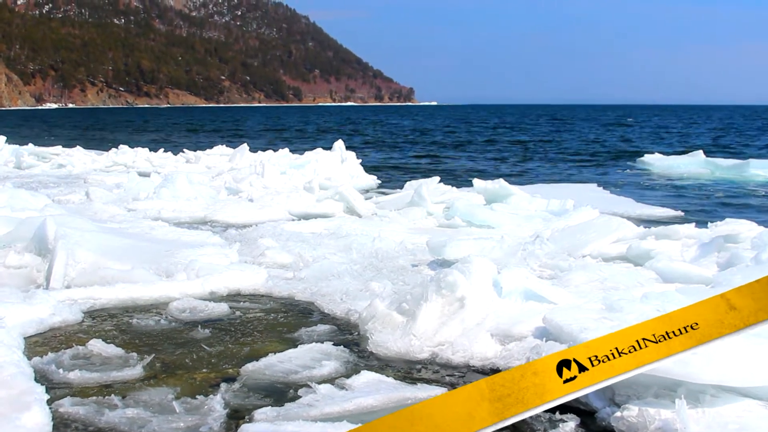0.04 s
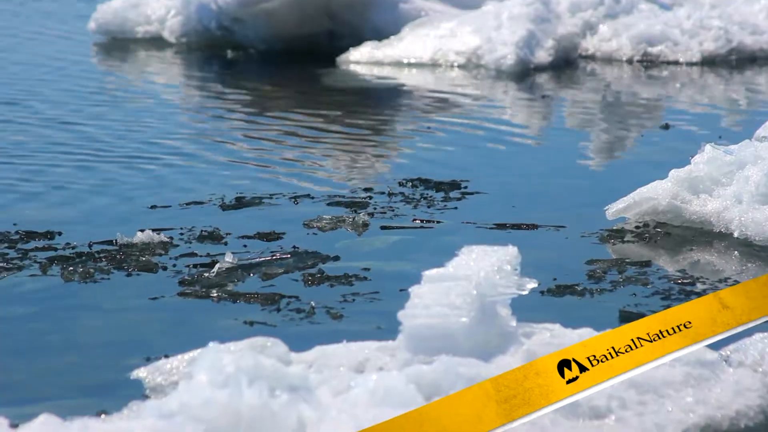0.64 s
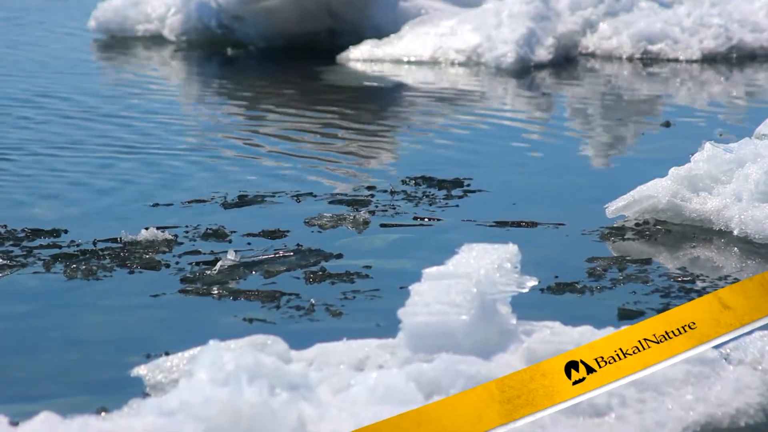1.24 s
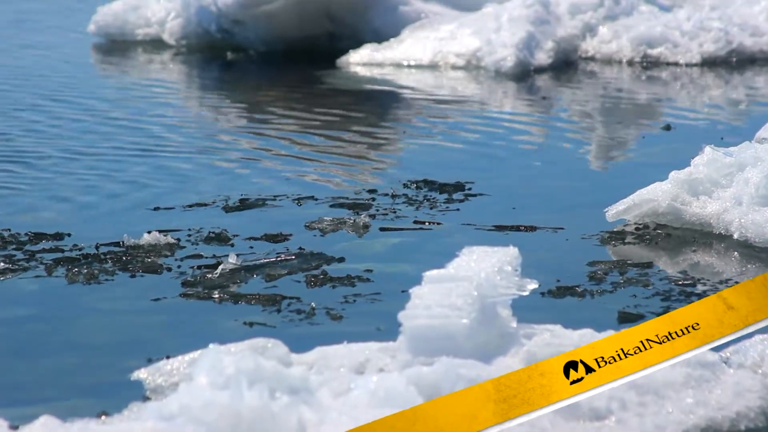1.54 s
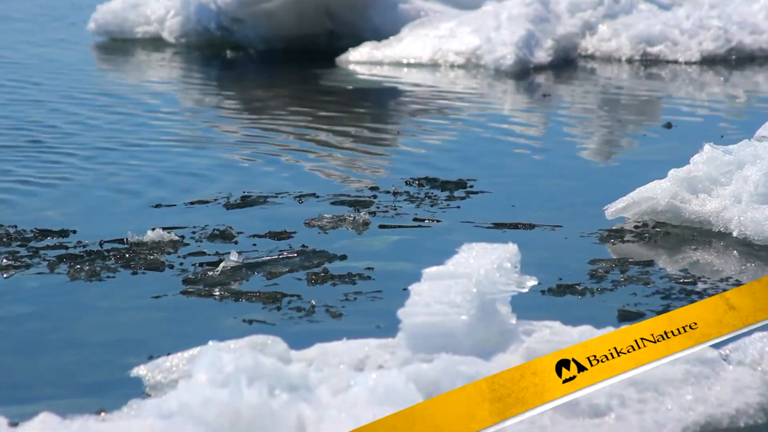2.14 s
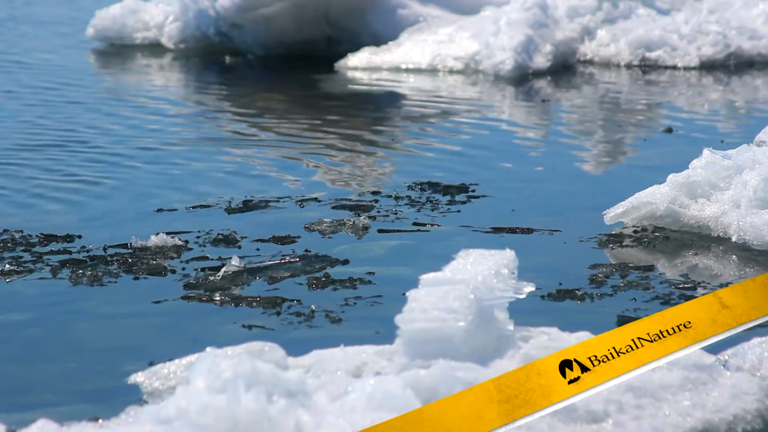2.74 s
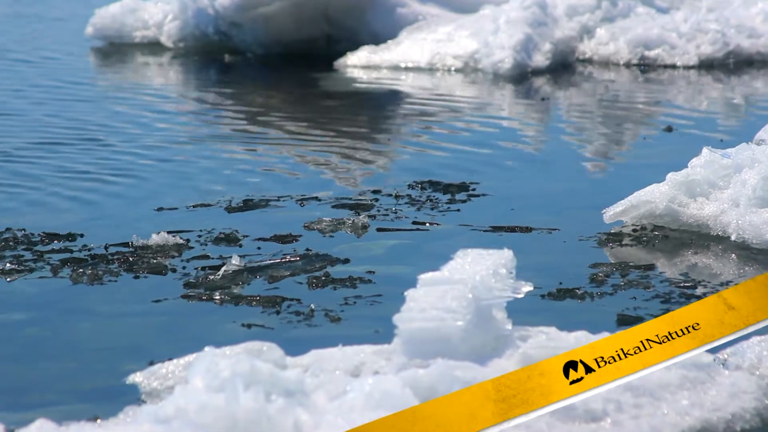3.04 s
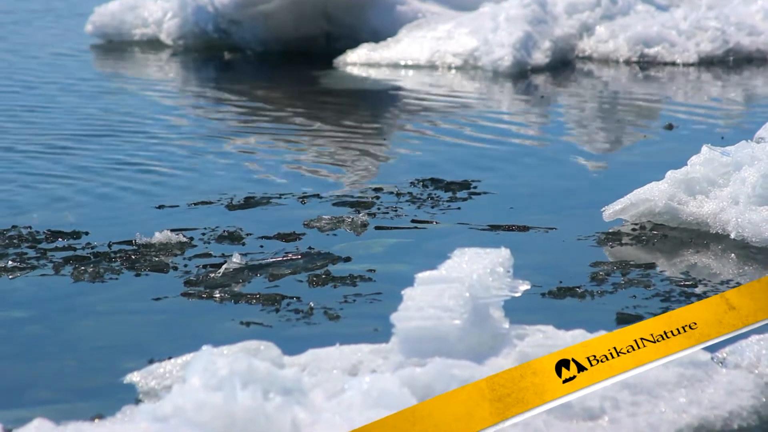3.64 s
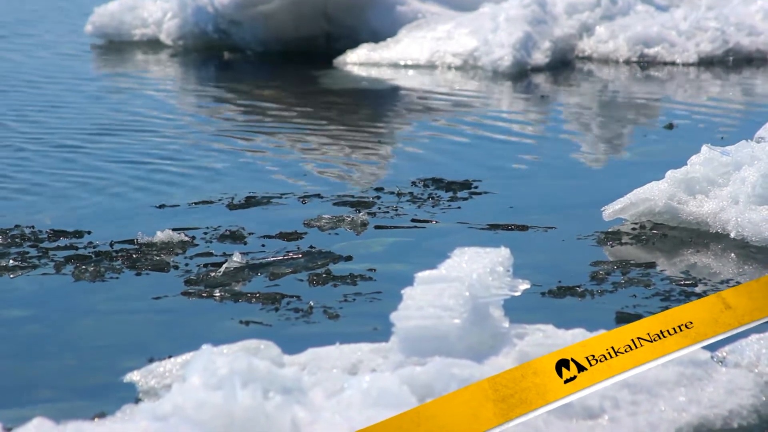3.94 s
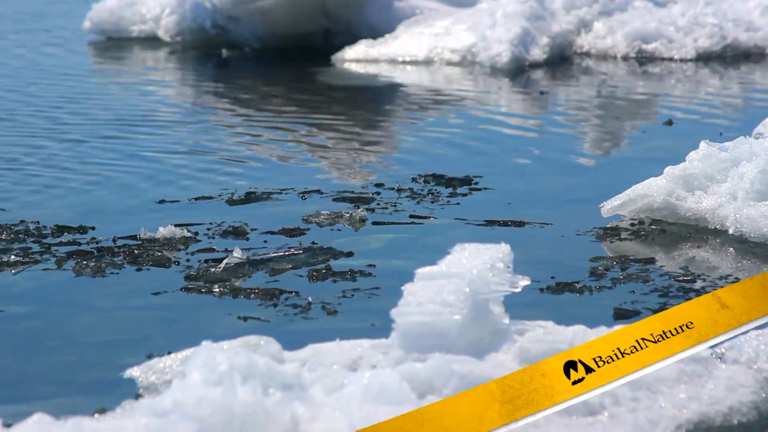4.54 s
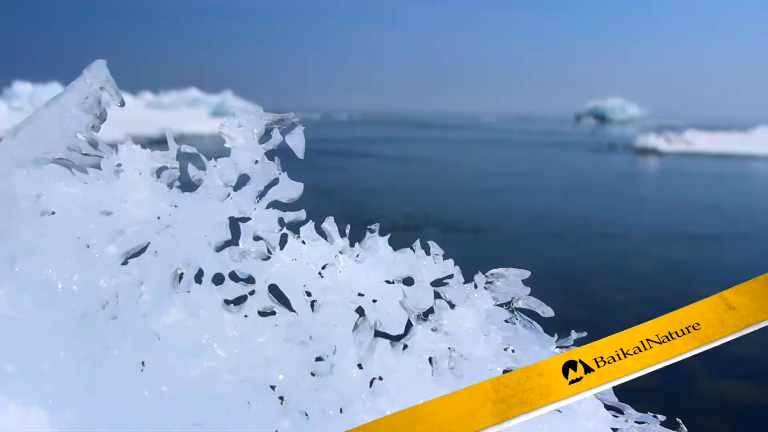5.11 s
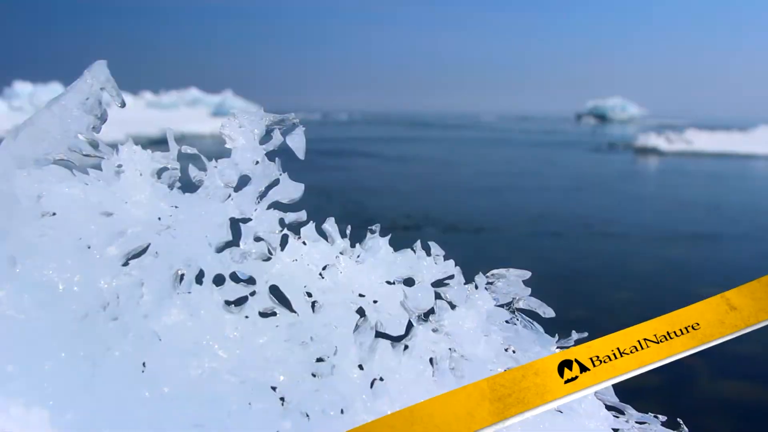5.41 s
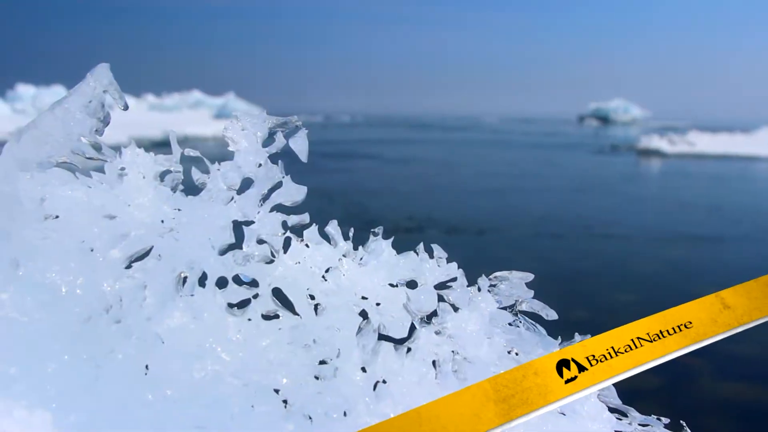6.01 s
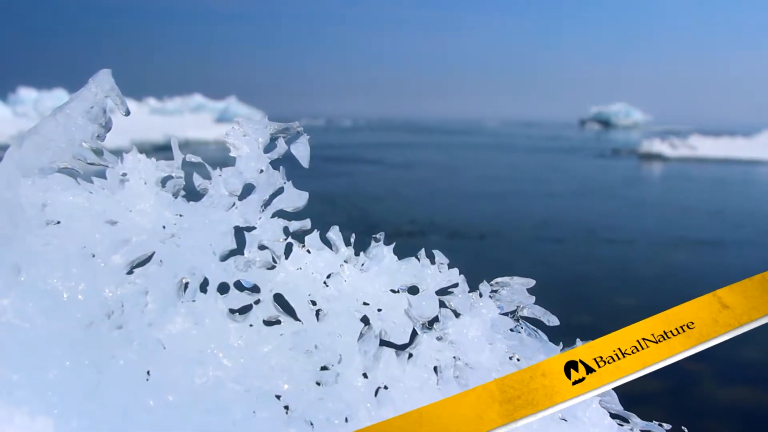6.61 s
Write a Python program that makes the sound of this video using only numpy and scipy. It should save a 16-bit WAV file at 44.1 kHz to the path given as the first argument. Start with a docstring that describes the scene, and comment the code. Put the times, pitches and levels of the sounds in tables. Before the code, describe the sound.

Small waves lap and trickle softly among melting ice at a lake edge for about seven seconds, over a steady, quiet wash of open water. Bubbles ring lightly and fine spray ticks on the ice. Close drips plink irregularly from about 0.8 to 4.6 seconds, and small watery slaps stand out a little at 3.6 and 4 seconds. Thin ice needles give tiny, high crackles near 1 and 3.9 seconds, then more often from 5 to 6.6 seconds. Wind rumbles on the microphone in uneven gusts, louder than the water: a brief puff at the start, buffeting from 1.3 to 3 seconds, a strong gust from 4.1 to 4.8, and another from 6.3 to the end. Low thumps of air come with the gusts. The hardest, at 4.3 seconds, briefly pushes the whole sound down, with smaller dips near 2.2 and 6.5 seconds.

```python
"""At the edge of a lake, small waves lap and trickle among melting ice, over the steady wash of open water.
The water traps air bubbles, which ring like tiny bells, and throws spray that ticks on the ice.
Drips plink and thin ice needles crackle close by. Gusts of wind rumble on the microphone,
and the hardest thumps of air make the limiter (an automatic volume control) turn everything down briefly."""
import sys
import numpy as np
from scipy import signal
from scipy.io import wavfile
from scipy.ndimage import uniform_filter1d

SR = 44100
rng = np.random.default_rng(int(sys.argv[2]) if len(sys.argv) > 2 else 0)


def persist_wave(psi):
    """Save psi, clipped to +-1, as 16-bit WAV."""
    counts = np.round(np.clip(psi, -1, 1) * 32767).astype(np.int16)
    wavfile.write(sys.argv[1], SR, np.atleast_2d(counts).T)


N = 302967
TIME = np.arange(N) / SR


def from_db(db):
    """Turn decibels into a number to multiply a sound by."""
    return np.exp(np.asarray(db) * (np.log(10) / 20))


def rms_one(x):
    """Scale a signal so that its average strength (rms) is 1."""
    return x / np.sqrt(np.mean(x ** 2) + 1e-20)


def in_time(rows):
    """Join a table's points with straight lines: one curve for each column after the time."""
    times, *columns = np.transpose(rows)
    return [np.interp(TIME, times, column) for column in columns]


def at_hz(spectrum, hz):
    """Look up the level at any pitch in a table of pitches and levels."""
    pitches, levels = np.transpose(spectrum)
    return np.interp(np.log(hz), np.log(pitches), levels)


def add(out, s, sound):
    """Mix a sound in, starting at s seconds."""
    start = max(0, round(s * SR))
    out[start:start + len(sound)] += sound[:max(0, N - start)]


def drift(rate_hz):
    """A smooth random wobble, about 1 in size; a higher rate wobbles faster."""
    step = 40  # samples between random values
    keep = np.exp(-2 * np.pi * rate_hz * step / SR)
    slow = signal.lfilter([1], [1, -2 * keep, keep * keep], rng.standard_normal(N // step + 2002))[2000:]
    return np.interp(np.arange(N) / step, np.arange(len(slow)), rms_one(slow))


def noise_bands(low_hz, high_hz, count):
    """Separate bands of noise from low to high, each with its middle pitch."""
    edges = np.geomspace(low_hz, high_hz, count + 1)
    for low, high in zip(edges, edges[1:]):
        band = signal.butter(2, [low, high], "band", fs=SR, output="sos")
        yield np.sqrt(low * high), signal.sosfilt(band, rng.standard_normal(N + SR // 2))[SR // 2:]


def ring(clicks, hz, cycles):
    """Each click starts a tone that fades by 60 dB over this many cycles (vibrations)."""
    angle = 2 * np.pi * min(hz, SR / 2) / SR
    keep = np.exp(-np.log(1000) * hz / (cycles * SR))
    return signal.lfilter([0, np.sin(angle)], [1, -2 * keep * np.cos(angle), keep * keep], clicks + 1e-18)


# How lively the water is, for the wash, lapping and spray: t/s, lapping level/dB, spray level/dB
LIVELINESS = [(0, -46.5, -51.5), (0.3, -47.5, -52.5), (0.9, -48.5, -53.5), (1.15, -49.5, -49.5),
              (1.6, -45, -54), (1.95, -45, -50.0), (2.25, -47.5, -49), (2.7, -43, -52.5),
              (3.0, -44.0, -52.5), (3.45, -47, -49), (3.8, -44.5, -54.5), (4.1, -44.5, -50),
              (4.5, -47.5, -50), (5.0, -45.5, -53.5), (5.4, -45.5, -52.5), (5.7, -45.5, -49),
              (6.1, -47.5, -53), (6.87, -46, -49)]
# The mix of low and high in the open water's hiss: f/Hz, level/dB
WASH_TONE = [(110, -6), (200, -2.5), (420, 3), (800, 0), (1350, 3.5), (1900, 1), (2800, -3), (3800, -7),
             (5000, -7.5), (7700, -11.5), (10000, -15), (13500, -21)]


def wash(level_db=5.0, patchy_db=2.0):
    """Countless far ripples merge into a hiss that swells with the water."""
    lap_db, spray_db = in_time(LIVELINESS)
    hiss = np.zeros(N)
    for hz, band in noise_bands(99.1, 14960, count=24):
        hiss += band * from_db(at_hz(WASH_TONE, hz) + patchy_db * drift(21.0))
    return from_db((lap_db + spray_db) / 2 + level_db) * rms_one(hiss)


def bubble_stream(spectrum, per_s, spread_db, cycles, clump_db, pitches=26):
    """Bubbles come in clumps of similar size, and each one rings for a moment."""
    out = np.zeros(N)
    odds = per_s / pitches / SR
    for hz in np.geomspace(spectrum[0][0], spectrum[-1][0], pitches):
        chance = rng.random(N)
        born = np.flatnonzero(chance < odds)
        size = np.minimum(-np.log(chance[born] / odds), 3)  # most are faint, a few stand out
        clicks = np.zeros(N)
        clicks[born] = from_db(spread_db * size + clump_db * np.tanh(drift(9.7)[born]))
        sharp = ring(clicks, hz, cycles)
        soft = ring(np.diff(sharp, prepend=0), hz, cycles)  # ringing twice softens the start
        out += from_db(at_hz(spectrum, hz)) * np.sqrt(hz) * rms_one(soft)
    return rms_one(out)


# The mix of low and high bubbles in the lapping water: f/Hz, level/dB
BUBBLE_TONE = [(450, 3), (900, 2.5), (1350, 1), (2100, 1), (3000, -4), (4000, -7)]
# The same for fine spray and the fizz of melting ice: f/Hz, level/dB
FIZZ_TONE = [(3500, 1), (5000, 7), (7700, 1), (10000, -10.5), (13500, -11)]


def lapping(bubble_db=-3.5, fizz_db=-6.0):
    """Moving water traps clumps of bubbles and throws off fine spray."""
    lap_db, spray_db = in_time(LIVELINESS)
    bubbles = bubble_stream(BUBBLE_TONE, per_s=600, spread_db=4.0, cycles=16.2, clump_db=4.0)
    fizz = bubble_stream(FIZZ_TONE, per_s=800, spread_db=-0.5, cycles=37, clump_db=12.0)
    return from_db(lap_db + bubble_db) * bubbles + from_db(spray_db + fizz_db) * fizz


def spray(patter_db=-6.5, patter_per_s=70, shower_per_s=250, spread_db=5.5, tick_s=0.0015):
    """Droplets tick on the ice: a faint patter all the time, and a shower with each of the WAVE_SLAPS."""
    _, spray_db = in_time(LIVELINESS)
    patter = from_db(spray_db + patter_db)
    shower_power = np.zeros(N)
    for s, _, _, length, db in WAVE_SLAPS:
        shower_power += from_db(db) ** 2 * np.exp(-2 * ((TIME - s) / length) ** 2)
    fade = np.exp(-1 / (tick_s * SR))
    treble = signal.butter(1, [2500, 9000], "band", fs=SR, output="sos")
    out = np.zeros(N)
    for per_s, gain in ((patter_per_s, patter), (shower_per_s, np.sqrt(shower_power))):
        lands = rng.random(N) < per_s / SR
        drops = lands * from_db(spread_db * np.minimum(rng.exponential(1, N), 3))
        ticks = signal.lfilter([1], [1, -fade], drops + 1e-18) * rng.standard_normal(N)
        out += gain * rms_one(signal.sosfilt(treble, ticks))
    return out


# Light air between the gusts: t/s, level/dB
LIGHT_AIR = [(0, -38.5), (0.5, -42.5), (0.85, -50.5), (1.5, -46), (1.85, -52.5), (2.6, -39.5), (3.05, -41),
             (3.22, -59), (3.7, -37.5), (3.9, -48.5), (5.1, -44.5), (5.68, -44), (5.8, -54), (5.95, -44.5),
             (6.87, -45)]
# Gusts on the microphone: t/s, length/s, level/dB, fading/(dB per s), brightness/(dB per octave)
WIND_GUSTS = [(0.0, 0.12, -27.5, 25, -0.5), (0.198, 0.096, -37, 27, 2.5), (0.562, 0.12, -41, 25, -9),
              (1.15, 0.04, -33.5, 20, -7.5), (1.296, 0.36, -27, 22, 0), (1.918, 0.31, -24.5, 27, 0.5),
              (2.096, 0.117, -18, -2, -2), (2.215, 0.34, -26, 13, 1.5), (2.69, 0.32, -31.5, 25, 2),
              (3.404, 0.035, -26, 20, -2.5), (3.516, 0.13, -28.5, 20, 2), (4.015, 0.033, -29, 20, -1),
              (4.144, 0.16, -21, 4, 1.5), (4.326, 0.18, -18.5, 11, -2), (4.539, 0.28, -22.5, 3, -4),
              (4.876, 0.17, -34.5, 1, -4), (5.14, 0.24, -38.5, 30, -1), (5.528, 0.05, -31.5, 20, -3.5),
              (6.13, 0.23, -27.5, 26, 0), (6.307, 0.54, -16.5, 9, 1.3)]


def gusts(attack_s=0.014, release_s=0.02, waver_db=2.0):
    """Gusts arrive fast, mostly sag, then drop back into the breeze. Gives level and brightness curves."""
    breeze_db, = in_time(LIGHT_AIR)
    power = from_db(breeze_db + waver_db * drift(4.2)) ** 2
    tilt = np.zeros(N)
    for s, length, db, sag, brightness in WIND_GUSTS:
        age = TIME - s
        attack = np.clip(1 + age / attack_s, 0, 1)
        release = np.exp(-np.maximum(age - length, 0) / release_s)
        gust_power = (from_db(db - sag * np.clip(age, 0, length)) * attack * release) ** 2
        power += gust_power
        tilt += brightness * gust_power
    return 10 * np.log10(power), tilt / power


# The mix of low and high in a full gust's rumble: f/Hz, level/dB
RUMBLE_TONE = [(20, -34), (40, -3), (65, -2), (100, 6), (140, 2.5), (210, -3), (300, -14), (460, -25.5),
               (750, -37), (1400, -63)]


def wind(full_gust_db=-26, brightest_db=-22, brightening=0.69, lumpy_db=3.5, flutter_db=2.5):
    """Air swirls at the microphone's opening. Stronger gusts make smaller swirls, so they sound brighter."""
    gust_db, brightness = gusts()
    tilt_per_octave = brightness + brightening * (np.minimum(gust_db, brightest_db) - full_gust_db)
    rumble, flutter = np.zeros(N), drift(25.4)
    puffs_db = 3.6 * np.tanh(drift(14))
    for hz, band in noise_bands(17.83, 1415, count=12):
        tilt_db = tilt_per_octave * np.log2(hz / 110)
        # swirls arrive together in short flurries, the smallest most of all
        flurry_db = flutter_db * flutter * np.log2(2 + hz / 200)
        rumble += band * from_db(at_hz(RUMBLE_TONE, hz) + tilt_db + flurry_db + lumpy_db * drift(31.7))
    # even out the rumble, so that the gust sets how loud it is
    strength = np.sqrt(uniform_filter1d(rumble ** 2, size=3200) + 1e-18)
    return from_db(gust_db) * rms_one(from_db(puffs_db) * rumble / strength)


# Small waves slapping the ice, plus one short plop at 4.003 s: t/s, level/dB, f/Hz, length/s, spray level/dB
WAVE_SLAPS = [(0.443, -44.5, 2370, 0.039, -67), (0.704, -43, 1320, 0.071, -51.5),
              (0.772, -41.5, 1910, 0.036, -65), (1.04, -44, 1900, 0.032, -60),
              (1.329, -48, 5100, 0.024, -50), (1.839, -44, 1890, 0.06, -51.5),
              (2.416, -43, 1560, 0.066, -58), (2.831, -44.5, 1530, 0.061, -59),
              (2.97, -46, 2900, 0.055, -48.5), (3.515, -42, 1740, 0.052, -52),
              (3.579, -36.5, 2160, 0.041, -54), (3.615, -41, 2500, 0.035, -46.5),
              (3.793, -50, 1680, 0.048, -60), (4.003, -36.5, 560, 0.0125, -57),
              (4.029, -37.5, 1600, 0.048, -52.5), (4.077, -49, 2620, .04, -51),
              (4.576, -46, 2880, 0.053, -58), (5.799, -46.5, 1140, 0.077, -63),
              (6.403, -48, 4900, 0.061, -46.5), (6.809, -36.5, 3630, 0.0039, -49)]


def slaps(pitch_scatter=0.226, rise=0.056, bubbles=24, cycles=32):
    """A small wave hits the ice and frees similar bubbles, each rising in pitch as it surfaces."""
    out, t = np.zeros(N), np.arange(SR // 20) / SR
    for s, db, hz, length, _ in WAVE_SLAPS:
        cloud = np.zeros(N)
        scatter = pitch_scatter * min(length / 0.0373, 1)  # closer pitches in the shortest slaps
        for when, pitch, size in rng.standard_normal((bubbles, 3)):
            turns = hz * np.exp(scatter * pitch) * t
            phase = 2 * np.pi * turns * (1 + rise * np.minimum(turns / cycles, 1))
            swell = 1 - np.exp(-turns / 2)
            fade = np.exp(-np.log(1000) * turns / cycles)
            add(cloud, s + when * length / 3, from_db(2 * size) * np.sin(phase) * swell * fade)
        out += cloud * from_db(db) * np.sqrt(length * SR / np.sum(cloud ** 2))
    return out


def plinks(rows, gain_db, rise, specks_db, specks_s, specks_cycles):
    """Short rings that may slide up in pitch, each trailed by specks: tiny droplets or splinters."""
    out, t = np.zeros(N), np.arange(SR // 16) / SR
    for s, db, hz, cycles in rows:
        age = hz * t / cycles
        phase = 2 * np.pi * np.cumsum(hz * (1 + rise * np.minimum(age, 1))) / SR
        swell = 1 - np.exp(-(hz * t) ** 2)
        tone = np.sin(phase) * swell * np.exp(-np.log(1000) * age)
        grit = ring(rng.laplace(size=len(t)), hz, specks_cycles)
        specks = rms_one(ring(np.gradient(grit), hz, specks_cycles)) * np.exp(-t / specks_s)
        plink = tone / np.max(np.abs(tone)) + from_db(specks_db) * specks
        add(out, s, from_db(db + gain_db) * plink)
    return out


# The nearest drips and bursting bubbles: t/s, relative level/dB, f/Hz, ring length/cycles
NEAR_DRIPS = [(0.7854, -27, 1400, 8.2), (1.1086, -26.5, 1790, 5.4), (1.2274, -20.5, 3060, 5.3),
              (1.238, -31, 2680, 55), (1.2975, -28.5, 1960, 28), (1.8719, -23, 1180, 3.3),
              (2.1149, -21, 1330, 6), (2.1449, -26, 2680, 10), (2.3932, -27, 4410, 16),
              (2.7721, -19.5, 2230, 12), (3.0221, -27, 1460, 33), (3.2007, -25.5, 2060, 8),
              (3.2989, -27, 2020, 17), (3.3602, -25.5, 950, 11), (3.5789, -29, 2060, 12),
              (3.9865, -23.5, 1950, 20), (4.1405, -22, 2980, 8), (4.4454, -24.5, 2480, 10),
              (4.565, -26, 2930, 18), (6.209, -32, 4400, 25)]


def drips():
    """A drip or bursting bubble rings with a slightly rising pitch and a tiny splash."""
    return plinks(NEAR_DRIPS, gain_db=-3.0, rise=0.033, specks_db=-9.5, specks_s=0.0054, specks_cycles=5.0)


# Ice needles cracking, alone or in a run: t/s, relative level/dB, f/Hz, length of the run/s
ICE_CRACKS = [(0.9756, -24.5, 5020, 0.003), (1.065, -31.5, 5930, 0.015), (2.8408, -36, 6600, 0.01),
              (3.8753, -29, 7750, 0.014), (5.1098, -34.5, 5700, 0.003), (5.5079, -33, 5350, 0.012),
              (6.0201, -33.5, 5210, 0.003), (6.1517, -35.5, 6500, 0.003), (6.3673, -34.5, 7340, 0.071),
              (6.4425, -29.5, 7260, 0.003), (6.5511, -29.5, 7800, 0.05)]


def ice_needles(gap_s=0.0095, run_fade_db=3.0, scatter_db=1, pitch_scatter=0.08, cycles=25):
    """One needle snaps and can set off its neighbours at uneven gaps, in a run that fades."""
    snaps = []
    for s, db, hz, length in ICE_CRACKS:
        snaps.append((s, db, hz, cycles))
        age = 0
        for gap, size, pitch in rng.standard_normal((16, 3)):
            age += gap_s * np.exp(gap / 2)
            if age < length:
                snap_db = db - run_fade_db * age / length + scatter_db * size
                snaps.append((s + age, snap_db, hz * np.exp(pitch_scatter * pitch), cycles))
    return plinks(snaps, gain_db=3.0, rise=0, specks_db=-8, specks_s=0.0036, specks_cycles=4.9)


# The hardest swirls of air hitting the microphone: t/s, level/dB, f/Hz
AIR_THUMPS = [(1.305, -18.5, 159), (1.355, -12.5, 164), (1.384, -20, 376), (1.924, -9, 147),
              (1.979, -11, 141), (2.118, -10, 230), (2.189, -2, 171), (2.393, -17.5, 365),
              (2.462, -16, 120), (2.734, -15, 142), (4.174, -7.5, 185), (4.223, -20, 360),
              (4.248, -14, 400), (4.292, 9.5, 272), (4.458, -5.5, 136), (4.723, -9, 224), (6.315, -6, 177),
              (6.365, -13.5, 447), (6.478, 1, 480), (6.552, -8, 340), (6.607, -7.5, 232)]


def thumps(roundness=4.74, wake_gap_s=0.009, wake_loss_db=12.0, wake_pitch_ratio=0.75):
    """A passing swirl is one short swing of air pressure, with two weaker, slower ones in its wake."""
    out, t = np.zeros(N), np.arange(-SR // 50, SR // 50) / SR
    for s, db, hz in AIR_THUMPS:
        for k, (turn, late) in enumerate(rng.random((3, 2))):
            swing_hz = hz * wake_pitch_ratio ** k
            pulse = (1 - 2j * np.pi * swing_hz * t / roundness) ** -roundness
            swing = (np.exp(2j * np.pi * turn) * pulse).real  # a random blend of push and pull
            delay = k * wake_gap_s * np.exp((late - 0.5) / 2)
            add(out, s + t[0] + delay, from_db(db - wake_loss_db * np.sqrt(k)) * swing)
    return out


def microphone_opening(pressure, cutoff_hz=1050):
    """The small opening rounds off the hardest swings of air and lets only their low part through."""
    return signal.sosfilt(signal.butter(4, cutoff_hz, fs=SR, output="sos"), np.tanh(pressure))


# Pitches that the camera body makes louder or softer: f/Hz, width/Hz, level change/dB
BODY_TONE = [(1735, 210, -3.5), (2014, 36, 3), (3030, 240, 1.5), (5000, 330, 1), (5020, 120, -1),
             (5280, 320, -2), (5940, 300, -0.5), (6280, 250, -7), (6400, 300, 3)]


def camera_body(sound):
    """The case around the microphone boosts some narrow ranges of pitch and weakens others."""
    for hz, width, db in BODY_TONE:
        b, a = signal.iirpeak(hz, hz / width, fs=SR)
        sound = sound + (from_db(db) - 1) * signal.lfilter(b, a, sound)
    return sound


def scene():
    """Water and ice in front and wind on the microphone, mixed into one channel."""
    water_and_ice = drips() + ice_needles() + wash() + lapping() + slaps() + spray()
    air = wind() + thumps()
    return (camera_body(water_and_ice) + microphone_opening(air))[None]


def record(dry, threshold_db=-6.5, attack_s=0.008, release_db_per_s=55, cutoff_hz=13700):
    """Peaks are clipped, the volume dips after hard thumps and creeps back, and the highest hiss is cut."""
    clipped = np.clip(dry, -1, 1)
    over_db = np.maximum(20 * np.log10(np.abs(clipped[0]) + 1e-9) - threshold_db, 0)
    # the limiter remembers each too-loud peak and lets go at a steady rate
    recovery_db = release_db_per_s * TIME
    held_db = np.maximum.accumulate(over_db + recovery_db) - recovery_db
    attack = np.exp(-1 / (attack_s * SR))
    dip_db = signal.lfilter([1 - attack], [1, -attack], held_db)
    soft_ends = np.minimum(np.minimum(TIME, TIME[::-1]) / 0.003, 1)
    low_pass = signal.ellip(10, 0.1, 90, cutoff_hz, fs=SR, output="sos")
    return signal.sosfilt(low_pass, clipped * from_db(-dip_db) * soft_ends)


dry = scene()
out = record(dry)
persist_wave(out)
```